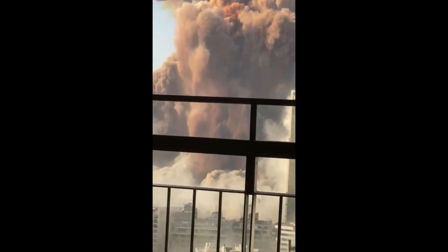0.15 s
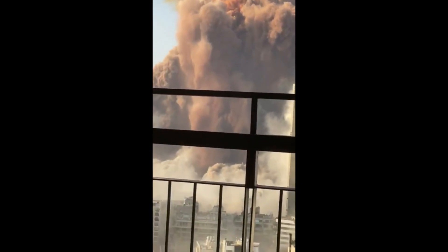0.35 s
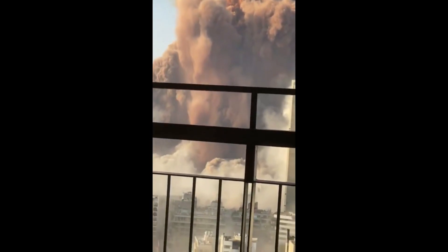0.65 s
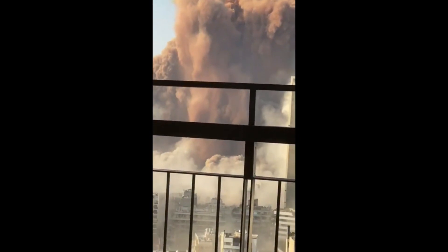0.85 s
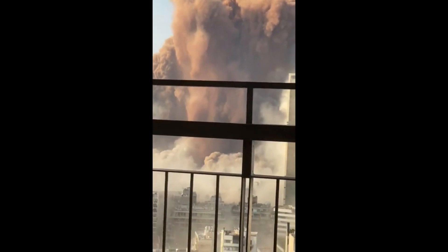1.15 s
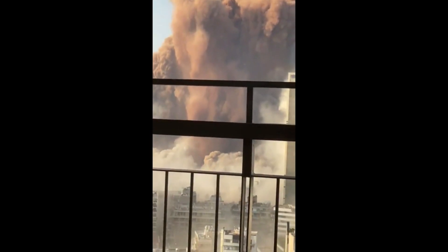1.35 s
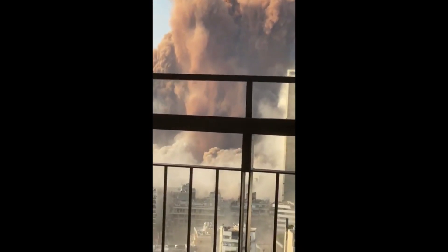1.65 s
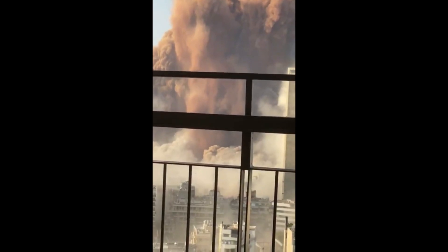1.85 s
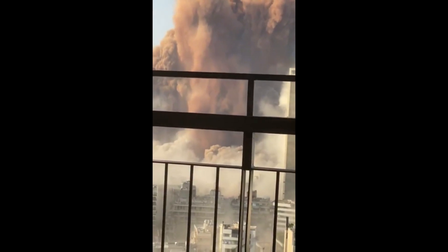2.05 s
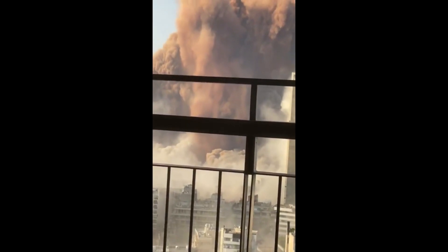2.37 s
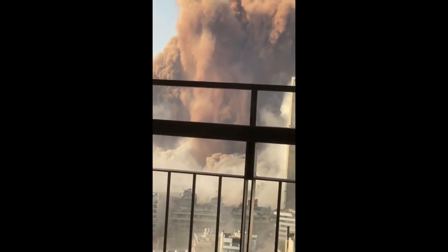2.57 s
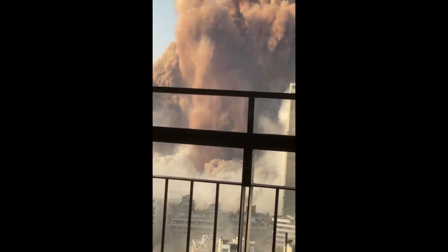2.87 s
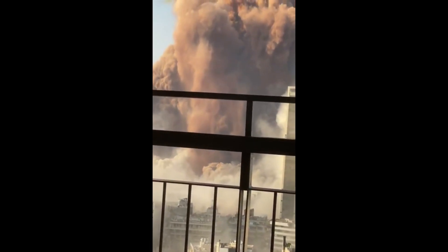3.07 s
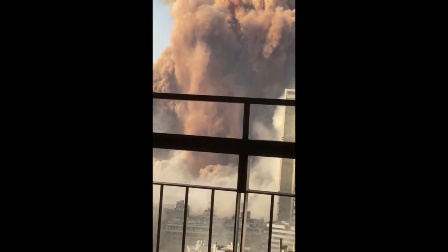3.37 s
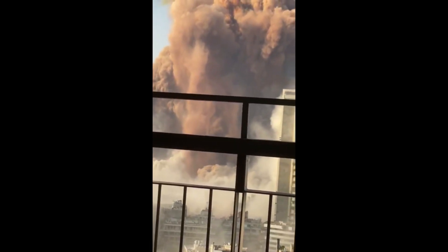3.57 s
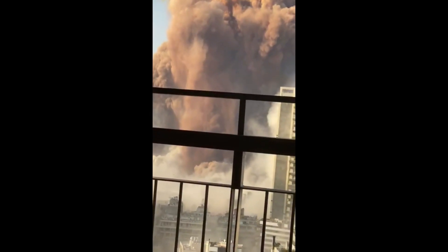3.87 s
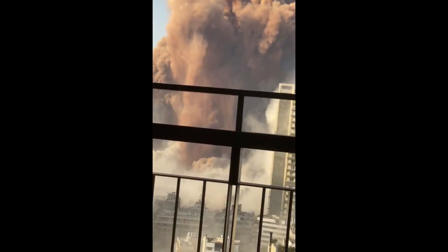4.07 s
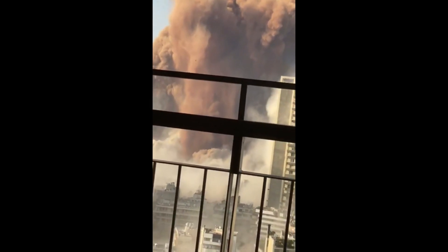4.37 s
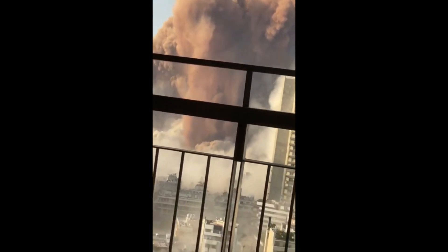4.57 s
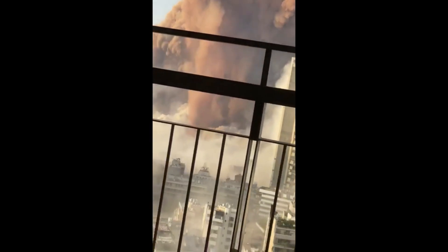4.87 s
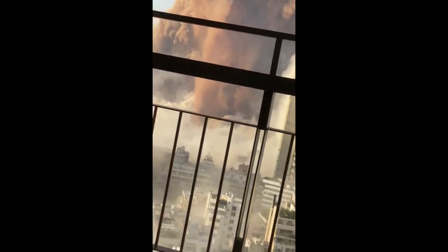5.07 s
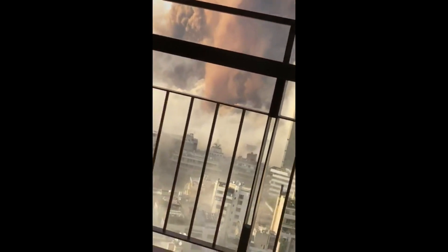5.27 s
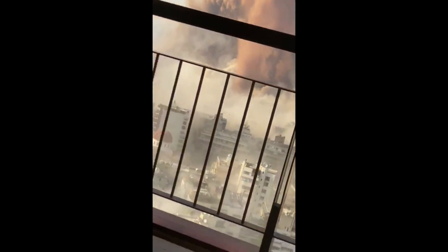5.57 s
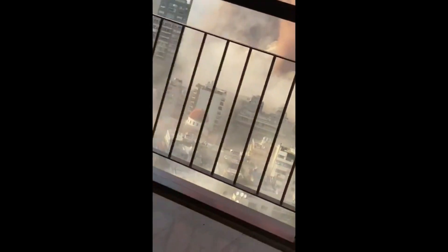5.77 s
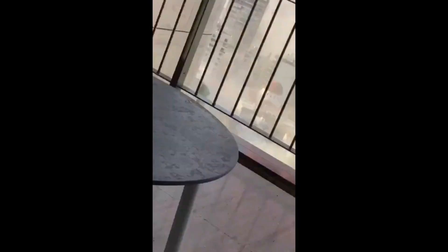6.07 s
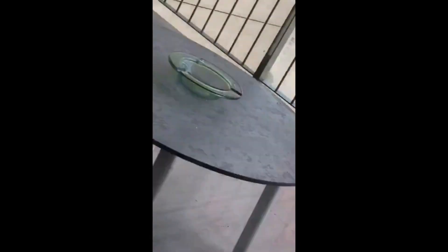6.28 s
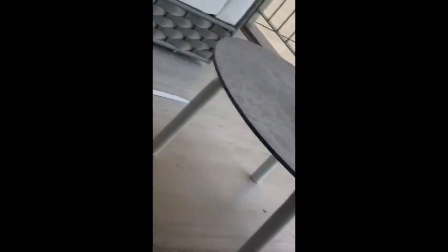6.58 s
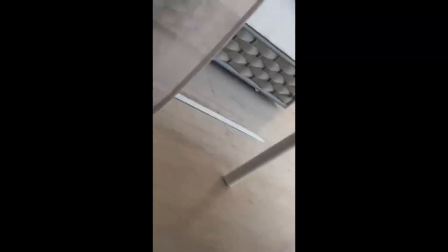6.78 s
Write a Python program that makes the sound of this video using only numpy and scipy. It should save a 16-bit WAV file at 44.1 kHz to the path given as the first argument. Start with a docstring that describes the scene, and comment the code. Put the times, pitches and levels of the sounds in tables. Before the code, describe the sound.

From a balcony above a town, the aftermath of a huge distant blast rolls on as a deep, uneven rumble and growl with soft thuds. Small ticks and sliding grit come early, close by. The roar and dust hiss slowly brighten. Near five seconds a hard panel cracks sharply, faint far car horns waver, a hand shifts dully on the handheld microphone, and a glass pings high at the end.

```python
"""The echoes of a huge far blast roll over a town as a deep rumble and growl: noise under a slow roll with
brief thuds; the roar swells and dust hisses. From 0.35 s loose things tick (band noise), at 0.44 s grit slides.
From 4.6 s far car horns come and go (blurred partials); at 4.76 s a hard panel cracks (noise burst, struck modes).
From 6.24 s a hand shifts on the casing (dull noise); at 6.78 s a glass pings (beating sines)."""
import sys
import numpy as np
from scipy import signal
from scipy.fft import rfft, irfft
from scipy.io import wavfile
from scipy.ndimage import uniform_filter1d

SR = 44100
rng = np.random.default_rng(int(sys.argv[2]) if len(sys.argv) > 2 else 0)


def invert_db(x):
    """Field ratio 10**(x/20) for x, a level in decibels (scalar or array-like)."""
    u = np.asarray(x, float) / 20
    return 10 ** u


def waveform_to_disk(signal):
    """Save audio, clipped to [-1, 1], as 16-bit WAV at the path in sys.argv[1]."""
    frames = np.transpose(np.atleast_2d(signal))
    scaled = np.clip(frames, -1, 1) * 32767
    samples = np.round(scaled).astype(np.int16)
    wavfile.write(sys.argv[1], SR, samples)


N = 305613
TIME = np.arange(N) / SR
HZ = np.fft.rfftfreq(N, 1 / SR)

# All spectra are relative, per Hz: (f/Hz, level/dB)
# slow roll of the echoes: (t/s, rumble level/dB, growl level/dB, roar level/dB)
ECHO_ROLL = [(0.0, -24.5, -31, -47.5), (.7, -24, -33, -46), (1.4, -26, -33, -43.5), (2.2, -26, -32.5, -42),
             (3.0, -27.5, -31.5, -40.5), (3.8, -25, -31.5, -39), (4.6, -24, -29.5, -37.5),
             (5.2, -23.5, -30.5, -36), (5.8, -21.5, -29.5, -35.5), (6.3, -22, -29, -35.5),
             (6.93, -23, -30, -34)]
# brief swells in the roll: (t of top/s, level over roll/dB, width at 1/e/s)
ECHO_THUDS = [(0.33, 5.5, 0.057), (0.782, 3.5, 0.13), (1.312, 1.5, 0.036), (1.825, 2.5, 0.23),
              (2.723, 4.5, 0.11), (3.4, 3.5, 0.29), (3.96, 2, 0.12), (4.423, 2, 0.19), (4.793, 5.5, 0.13),
              (5.94, 5, 0.14), (6.316, 1.5, 0.054), (6.7, 7.5, 0.021), (6.855, 6.5, 0.09)]
# broad surges in growl and roar: (t of top/s, level/dB, width at 1/e/s)
ROAR_SURGES = [(4.4, 1.5, .2), (5.95, 2, .2)]
# deep rumble spectrum: (f/Hz, level/dB)
RUMBLE_SPECTRUM = [(16, -48), (28, -23), (48, -1.5), (70, 3.5), (99, -1), (161, -7), (200, -16.5),
                   (260, -45.5), (440, -120)]
# growl spectrum at the start, then at the end: (f/Hz, level/dB)
GROWL_EARLY_SPECTRUM = [(120, -20), (200, 2.5), (226, -4), (286, -5.5), (700, -21.5), (910, -40.5),
                        (1540, -120)]
GROWL_LATE_SPECTRUM = [(120, -23.5), (200, -3.5), (247, -0.5), (284, -4), (700, -12), (910, -48),
                       (1540, -120)]
# roar spectrum at the start, halfway, at the end: (f/Hz, level/dB)
ROAR_EARLY_SPECTRUM = [(410, -28), (700, -4.5), (835, -6), (1050, -8.5), (1400, -11), (1790, -10.5),
                       (2220, -16), (4400, -29), (5720, -50), (9680, -120)]
ROAR_MIDDLE_SPECTRUM = [(410, -24), (700, -2), (798, -1.5), (1300, -4), (1750, -4), (2050, -9), (2400, -11),
                        (3490, -18), (4400, -27), (5720, -57.5), (9680, -120)]
ROAR_LATE_SPECTRUM = [(410, -30.5), (700, 0.5), (1930, -8.5), (3890, -20.5), (4400, -35), (5720, -48),
                      (9680, -120)]
# dust in the air: (t/s, hiss level/dB before normalizing)
DUST_CURVE = [(0, -69), (.3, -65), (1.2, -63), (2.6, -60), (4.1, -60), (4.9, -58), (5.5, -55.5), (6.2, -56),
              (6.93, -56.5)]
# dust hiss spectrum: (f/Hz, level/dB)
DUST_SPECTRUM = [(2590, -41.5), (4400, -4), (4830, -1.5), (5250, -6), (8030, -17), (9820, -24),
                 (11000, -46), (11500, -33.5), (14900, -66.5), (22000, -120)]
# small ticks: (t/s, noise level before envelope/dB, low edge f/Hz, high edge f/Hz, t60/s)
TICK_EVENTS = [(0.353, -45, 2750, 6240, 0.17), (.4705, -34, 1400, 3800, 0.035),
               (.477, -33, 1200, 7800, 0.03), (1.0605, -38, 2900, 4100, .02),
               (1.068, -30, 2500, 4400, 0.028), (6.088, -41, 2900, 3250, 0.12),
               (.484, -44.5, 1500, 5220, 0.48), (1.075, -43, 2000, 4200, 0.13),
               (0.798, -44, 2500, 4200, 0.055), (1.074, -51, 5000, 6200, 0.23),
               (1.362, -46.5, 3440, 7000, 0.097), (1.542, -51.5, 4800, 10900, 0.21),
               (1.704, -50, 5830, 7150, 0.2), (1.737, -49.5, 6000, 7130, .2),
               (2.442, -37.5, 3420, 8000, 0.27), (4.957, -40.5, 7070, 8400, 0.041),
               (5.069, -36.5, 6860, 8460, 0.026), (5.514, -36.5, 4520, 5480, 0.094),
               (5.56, -47, 5140, 9100, 0.2), (6.58, -55.5, 8440, 11200, 0.24),
               (6.745, -45, 3950, 11400, 0.45), (6.765, -40.5, 4000, 7640, 0.83)]
# grit sliding over tiles: (t/s, level/dB before normalizing)
SLIDE_CURVE = [(.44, -69), (.52, -63.5), (.6, -52), (.68, -54), (.75, -51), (.8, -52.5), (.85, -55.5),
               (.94, -54.5), (.99, -75)]
# sliding grit spectrum: (f/Hz, level/dB)
SLIDE_SPECTRUM = [(1800, -38), (2800, -9.5), (4500, -12.5), (5300, -12.5), (8000, -13), (10500, -11.5),
                  (11000, -1.5), (11600, -28), (12500, -50)]
# far horn partials that clear the roar: (f/Hz)
HORN_PARTIALS_HZ = (974, 1212, 1461, 2270, 2662, 2879, 3104, 3497, 3987)
# one curve a partial, before fading: (t/s, level/dB rms)
HORN_CURVES = [
    [(6.65, -75), (6.75, -50), (6.85, -48), (6.93, -52)],
    [(6.58, -70), (6.64, -45), (6.72, -54), (6.8, -70)],
    [(6.6, -70), (6.69, -43), (6.82, -43.5), (6.9, -41), (6.93, -42)],
    [(5.88, -75), (5.95, -49), (6.03, -46), (6.1, -70)],
    [(5.22, -75), (5.33, -51), (5.52, -50), (5.57, -62), (5.8, -59), (5.93, -53), (6.0, -47), (6.1, -52),
     (6.16, -75)],
    [(5.5, -75), (5.62, -55), (5.68, -55), (5.76, -75)],
    [(4.58, -75), (4.66, -56), (4.72, -52), (4.85, -58), (4.95, -50), (5.01, -56), (5.07, -78), (5.24, -78),
     (5.31, -50), (5.36, -44), (5.42, -46), (5.5, -52), (5.56, -51), (5.65, -58), (5.7, -51), (5.77, -48),
     (5.82, -66), (5.89, -54), (5.95, -48), (6.0, -58), (6.04, -64), (6.1, -48), (6.16, -75)],
    [(5.19, -75), (5.24, -51), (5.35, -50), (5.45, -53), (5.55, -58), (5.65, -54), (5.75, -57), (5.8, -66),
     (5.95, -62), (6.05, -78)],
    [(4.6, -78), (4.66, -60), (4.72, -56), (4.8, -78), (5.28, -78), (5.38, -59), (5.46, -78), (5.72, -78),
     (5.79, -60), (5.95, -61), (6.02, -78), (6.14, -78), (6.21, -60), (6.35, -54), (6.41, -58), (6.46, -78),
     (6.78, -78), (6.9, -58), (6.93, -58)],
]
# rough part rms over clean part amplitude, one a partial: (ratio)
HORN_ROUGHNESS = (.4, .4, .2, 3, .6, .5, .3, .3, .25)
# the crack: (t/s, level/dB before envelopes)
CRACK_EVENT = [(4.76, -13.5)]
# broad crack noise spectrum: (f/Hz, level/dB)
CRACK_SPECTRUM = [(410, -15.5), (700, 1), (864, -18.5), (949, -1), (1720, -14), (2050, -3), (2720, -8),
                  (3280, -7.5), (4400, -11), (4770, -12), (5960, -16.5), (7990, -31), (11500, -35),
                  (14900, -66), (22000, -120)]
# crack resonances: (f/Hz, width/Hz, level/dB)
CRACK_RESONANCES = [(1880, 50, 2), (3500, 100, -7), (6000, 320, -7.5), (8000, 1000, -6.5), (9600, 170, -22)]
# splits that strike the panel: (t/s, level/dB)
PANEL_BLOWS = [(4.7658, -36), (4.7683, -32), (4.7743, -31), (4.797, -32), (4.815, -37), (4.838, -37)]
# panel modes: (f/Hz, level re blow/dB, t60/s)
PANEL_MODES = [(1658, -5, .12), (2000, -13, .5), (2008, 5, .05), (2095, 1, .08), (2466, -5, .12),
               (3020, -6, .1), (3354, -6, .12), (3817, -13, .15), (5254, -13, .2), (5706, -11, .15),
               (6002, -17, .25), (6165, -18, .3), (7445, -18, .2)]
# hand shifting its grip: (t/s, level/dB before envelope, t60/s)
GRIP_SHIFTS = [(6.24, -45.5, 0.61), (6.47, -31.5, 0.55), (6.58, -42, 0.18)]
# pinged glass modes: (f/Hz)
GLASS_MODES_HZ = (9960, 10050, 10105, 10135, 10260)
# one row a glass mode: (level/dB, t60/s)
GLASS_DECAYS = [(-42.5, 0.55), (-51, 1.2), (-45, 1.5), (-44, 1.5), (-50, .5)]
# opposite-sign noise at the two ports re shared noise: (f/Hz, level/dB)
PORT_APART = [(60, -47.5), (300, -36.5), (1000, -12), (1700, -29.5), (2600, -1.5), (3700, -27), (4500, -16),
              (4870, -23), (5150, -4.5), (5700, -21.5), (7200, -10), (9000, -6.5), (11000, -7.5)]
# phase lead of the left port: (f/Hz, lead/rad)
PORT_LEAD = [(0, 0), (1950, 0), (2600, 1.15), (3300, .2), (4150, .1), (4500, 1.4), (4800, 3.0), (4940, 3.3),
             (5200, 6.28), (6000, 6.35), (6600, 6.6), (7600, 7.7), (9500, 9.0), (10100, 8.4), (10500, 9.0),
             (11500, 9.4)]
# left minus right port: (f/Hz, level/dB)
PORT_LOUDER = [(60, 0), (200, .1), (340, .7), (610, 2.4), (1000, 2.4), (1500, .3), (2500, 0), (11000, -.2)]


def rms_one(x):
    """Scales to unit rms."""
    return x / np.sqrt(np.mean(x ** 2) + 1e-20)


def in_time(rows):
    """Each column of a curve table, sample by sample."""
    s, *columns = np.transpose(rows)
    return [np.interp(TIME, s, column) for column in columns]


def at_hz(points):
    """A spectrum table read at every frequency, on a log axis."""
    hz, value = np.transpose(points)
    return np.interp(np.log(HZ + 1), np.log(hz + 1), value)


def coloured(white, spectrum):
    """Noise given a spectrum; rms 1."""
    return rms_one(irfft(rfft(white) * invert_db(at_hz(spectrum)), N))


def port_noise():
    """Noise at two ports: a shared white part and a filtered part of opposite sign."""
    shared, own = rng.standard_normal((2, N))
    opposite = irfft(rfft(own) * invert_db(at_hz(PORT_APART)), N)
    return shared + opposite * [[1], [-1]]


def flicker(rms_db, size):
    """Random gain that changes over about size samples."""
    smooth = uniform_filter1d(uniform_filter1d(rng.standard_normal(N), size), size)
    return invert_db(rms_db * rms_one(smooth))


def resonance(x, hz, width_hz):
    """Two-pole band-pass of gain 1 on top."""
    r = np.exp(-np.pi * width_hz / SR)
    poles = [1, -2 * r * np.cos(2 * np.pi * hz / SR), r * r]
    return signal.lfilter([(1 - r * r) / 2, 0, (r * r - 1) / 2], poles, x)


def struck(start_s, rise_s, t60_s):
    """Envelope that swells from its start and dies away exponentially."""
    age = np.maximum(TIME - start_s, 0)
    return (1 - np.exp(-age / rise_s)) ** 2 * invert_db(-60 * age / t60_s)


def swells(rows):
    """Sum of Gaussian bumps in dB."""
    return sum(db * np.exp(-(2 * (TIME - s) / length) ** 2) for s, db, length in rows)


def echoes():
    """Countless overlapping echoes blend to noise; later ones come over the roofs less dulled."""
    growl_share, roar_share = 0.5, 0.17     # of a thud's rise in dB
    rumble_db, growl_db, roar_db = in_time(ECHO_ROLL)
    thud_db, surge_db = swells(ECHO_THUDS), swells(ROAR_SURGES)
    late = 2 * TIME / TIME[-1] - 1          # -1 at the start, 1 at the end
    white = port_noise()
    rumble = coloured(white, RUMBLE_SPECTRUM)
    roar = np.maximum(-late, 0) * coloured(white, ROAR_EARLY_SPECTRUM)
    roar += (1 - abs(late)) * coloured(white, ROAR_MIDDLE_SPECTRUM)
    roar += np.maximum(late, 0) * coloured(white, ROAR_LATE_SPECTRUM)
    other = port_noise()
    growl = (1 - late) / 2 * coloured(other, GROWL_EARLY_SPECTRUM)
    growl += (1 + late) / 2 * coloured(other, GROWL_LATE_SPECTRUM)
    out = invert_db(rumble_db + thud_db) * rumble
    out += invert_db(growl_db + growl_share * thud_db + surge_db) * growl
    out += invert_db(roar_db + roar_share * thud_db + surge_db) * roar
    return out


def grit(curve, spectrum, grain_db, puff_db):
    """Bright hiss with uneven grains, coming in small puffs."""
    uneven = flicker(grain_db, size=150) * flicker(puff_db, size=2000)
    return invert_db(in_time(curve)[0]) * rms_one(uneven * coloured(port_noise(), spectrum))


def ticks(snap_share):
    """Each tick: a short snap and its scatter off the walls, within its own band."""
    white, out = port_noise(), np.zeros((2, N))
    for s, db, low_hz, high_hz, t60_s in TICK_EVENTS:
        part = slice(int(s * SR), int((s + .5) * SR))
        snap = struck(s, .0006, .015)
        scatter = struck(s, .003, t60_s)
        shape = snap * snap_share + scatter * (1 - snap_share)
        band = signal.butter(2, [low_hz, high_hz], "band", fs=SR, output="sos")
        noise = rms_one(signal.sosfilt(band, white[:, part]))
        out[:, part] += invert_db(db) * noise * shape[part]
    return out


def horns():
    """Horn partials, blurred and wavering on the long way through stirred air."""
    fading_db, waver_share = 1.5, .0012     # both rms; waver as a share of pitch
    out = np.zeros(N)
    for hz, curve, blur in zip(HORN_PARTIALS_HZ, HORN_CURVES, HORN_ROUGHNESS):
        on = (TIME > curve[0][0]) * (TIME <= curve[-1][0])
        level = invert_db(in_time(curve)[0]) * on
        rough = rms_one(resonance(rng.standard_normal(N), hz, 40 * blur))
        smooth = uniform_filter1d(uniform_filter1d(rng.standard_normal(N), size=5000), size=5000)
        phase = 2 * np.pi * hz * np.cumsum(1 + waver_share * rms_one(smooth)) / SR
        partial = rms_one(np.sin(phase) + blur * rough)
        out += level * flicker(fading_db, size=4000) * partial
    return out


def crack(ring_db):
    """A hard panel splits in a ragged burst that builds up; walls and its resonances draw it out."""
    s, db = CRACK_EVENT[0]
    white = port_noise()
    shape = 0.69 * struck(s, 0.0051, 0.1) + 0.5 * struck(s, 0.0092, 0.62)
    broad = coloured(white, CRACK_SPECTRUM) * shape
    rings = sum(invert_db(gain_db) * resonance(white, hz, width_hz) for hz, width_hz, gain_db in CRACK_RESONANCES)
    rings = rms_one(rings) * struck(s, 0.005, 0.26)
    ragged = flicker(1.6, size=90)
    return invert_db(db) * ragged * (0.5 * broad + invert_db(ring_db) * rings)


def panel(spread_db):
    """Every split strikes the panel's decaying modes, each with a random strength."""
    luck = rng.standard_normal((len(PANEL_BLOWS), len(PANEL_MODES)))
    part = slice(int(4.7 * SR), int(5.3 * SR))
    out = np.zeros(N)
    for row, (s, blow_db) in zip(luck, PANEL_BLOWS):
        age = np.maximum(TIME[part] - s, 0)
        for chance, (hz, mode_db, t60_s) in zip(row, PANEL_MODES):
            level_db = blow_db + mode_db + spread_db * chance - 60 * age / t60_s
            out[part] += invert_db(level_db) * np.sin(2 * np.pi * hz * age)
    return out


def grip(cut_hz):
    """Dull pushes on the casing, opposite at the two ports."""
    band = signal.butter(2, [40, cut_hz], "band", fs=SR, output="sos")
    dull = rms_one(signal.sosfilt(band, rng.standard_normal(N)))
    pushes = sum(invert_db(db) * struck(s, 0.017, t60_s) for s, db, t60_s in GRIP_SHIFTS)
    return pushes * dull * [[1], [-1]]


def glass(start_s):
    """Close modes of the glass beat against each other as they die away."""
    out = np.zeros(N)
    for hz, (db, t60_s) in zip(GLASS_MODES_HZ, GLASS_DECAYS):
        out += invert_db(db) * struck(start_s, .002, t60_s) * np.sin(2 * np.pi * hz * TIME)
    return out


def scene():
    """All sources at the two microphone ports."""
    dust = grit(DUST_CURVE, DUST_SPECTRUM, grain_db=1.0, puff_db=0.9)
    slide = grit(SLIDE_CURVE, SLIDE_SPECTRUM, grain_db=1.6, puff_db=1.0)
    far = echoes() + horns()
    broken = crack(ring_db=-15) + panel(spread_db=2.0)
    near = ticks(snap_share=0.39) + broken + grip(cut_hz=260) + glass(start_s=6.778)
    return far + dust + slide + near


def roll_off(x):
    """The treble ends steeply here."""
    return signal.sosfilt(signal.butter(12, 11630, fs=SR, output="sos"), x)


def record(dry):
    """The ports differ in level and phase by frequency; the sound opens over 4 ms."""
    hz, lead_rad = np.transpose(PORT_LEAD)
    # half the difference to each port
    half = invert_db(at_hz(PORT_LOUDER) / 2) * np.exp(.5j * np.interp(HZ, hz, lead_rad))
    ports = irfft(rfft(dry) * [half, 1 / half], N)
    mix = ports * np.minimum(TIME / .004, 1)
    return roll_off(mix)


dry = scene()
out = record(dry)
waveform_to_disk(out)
```